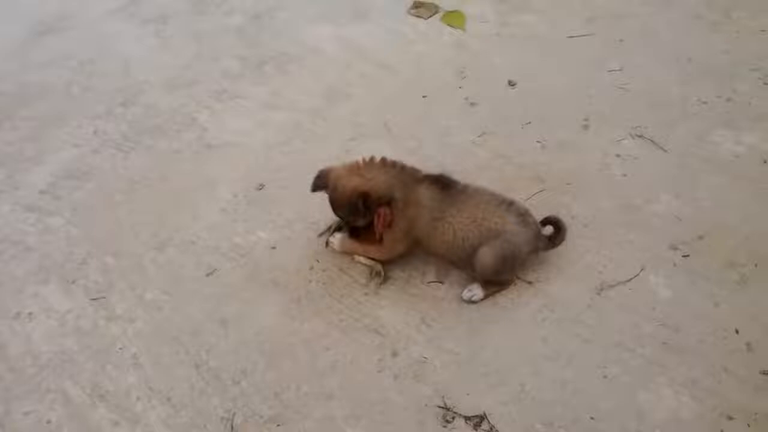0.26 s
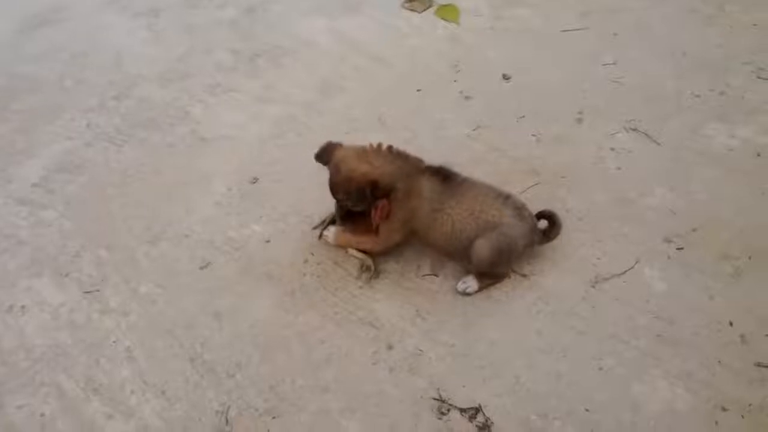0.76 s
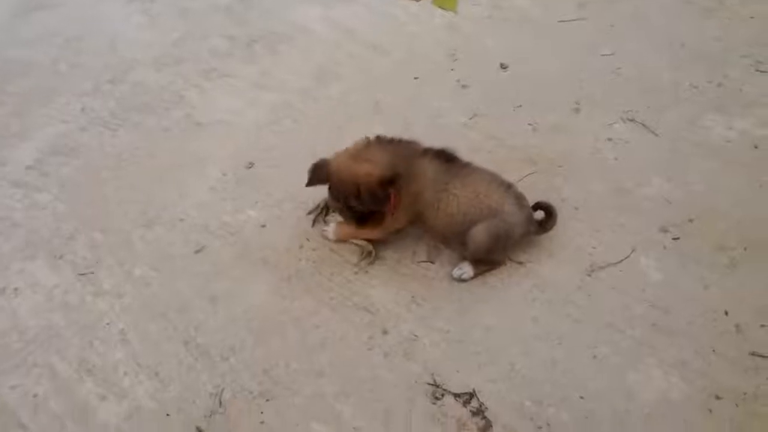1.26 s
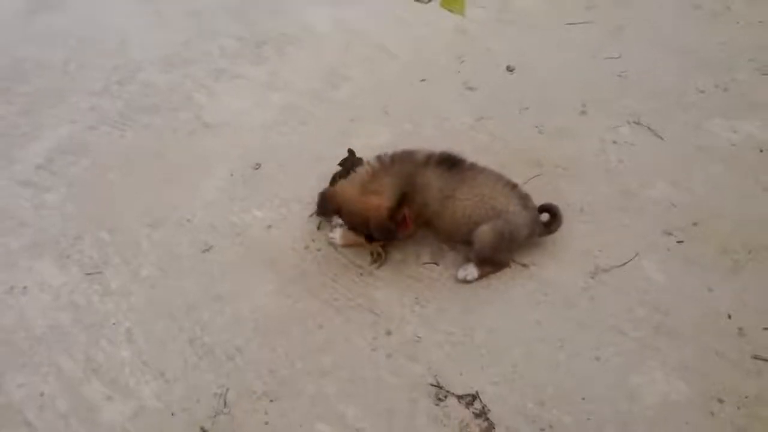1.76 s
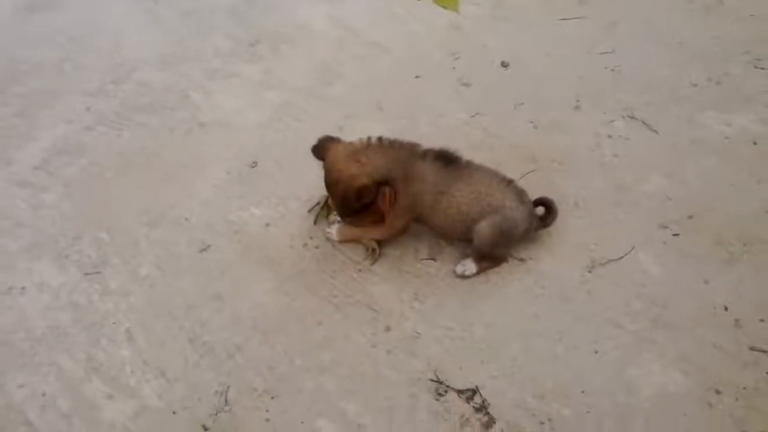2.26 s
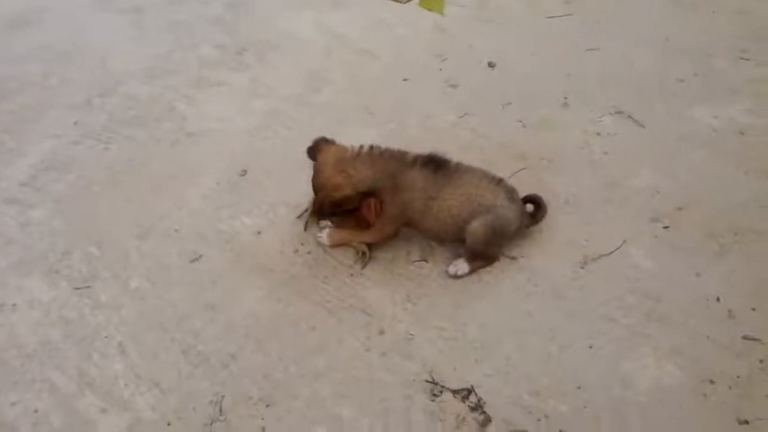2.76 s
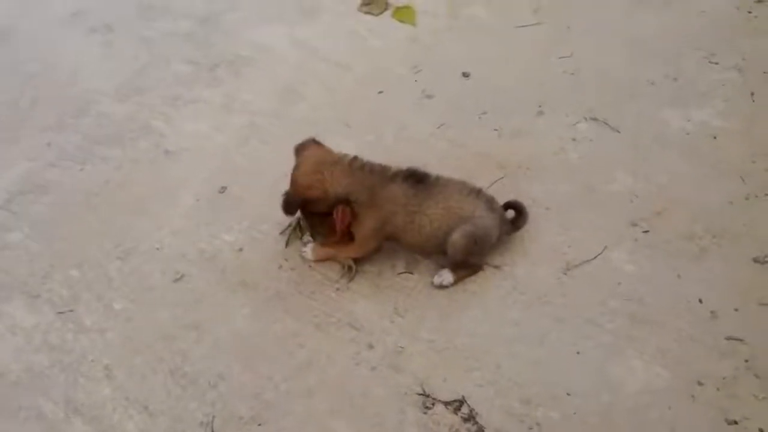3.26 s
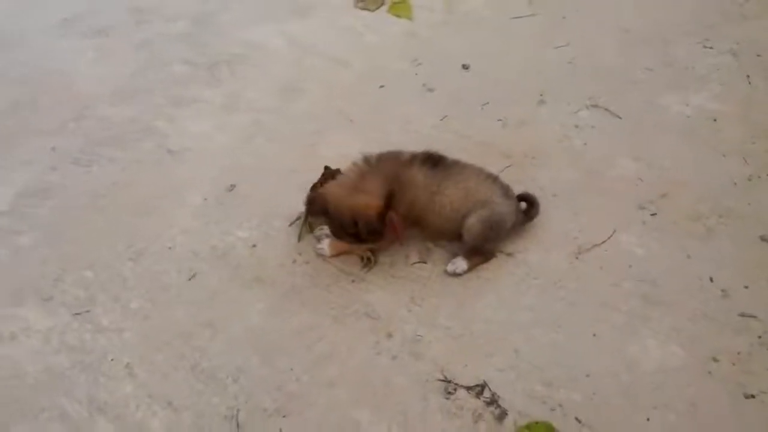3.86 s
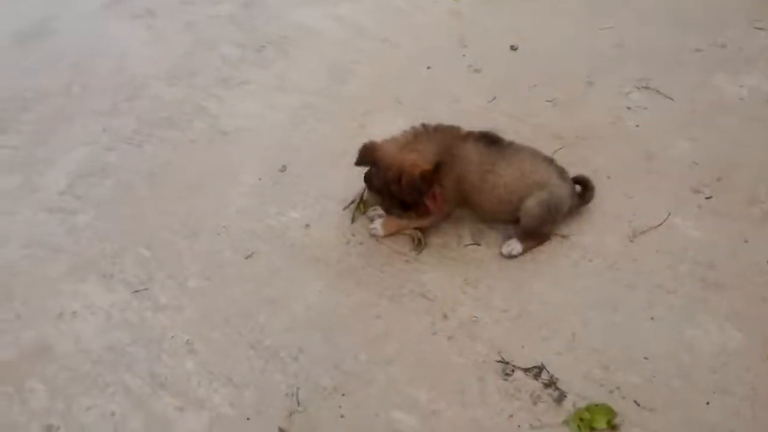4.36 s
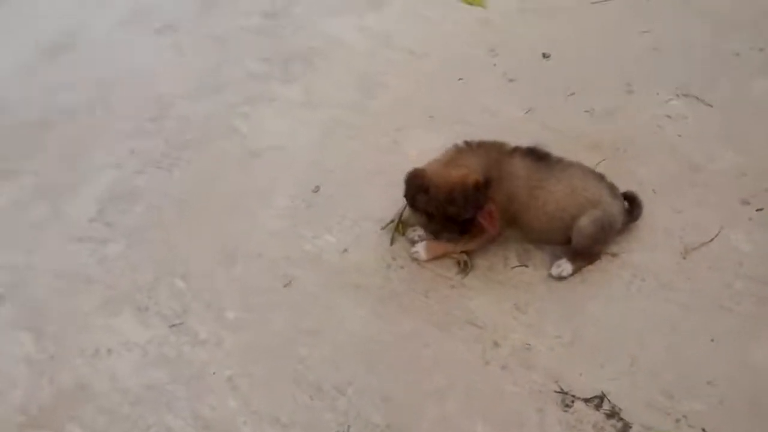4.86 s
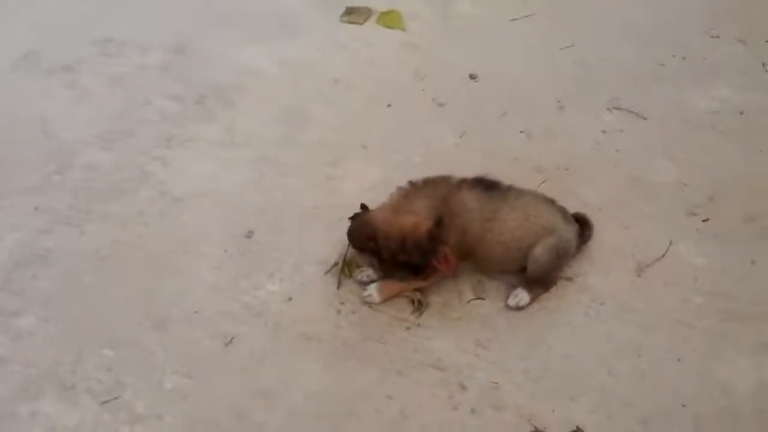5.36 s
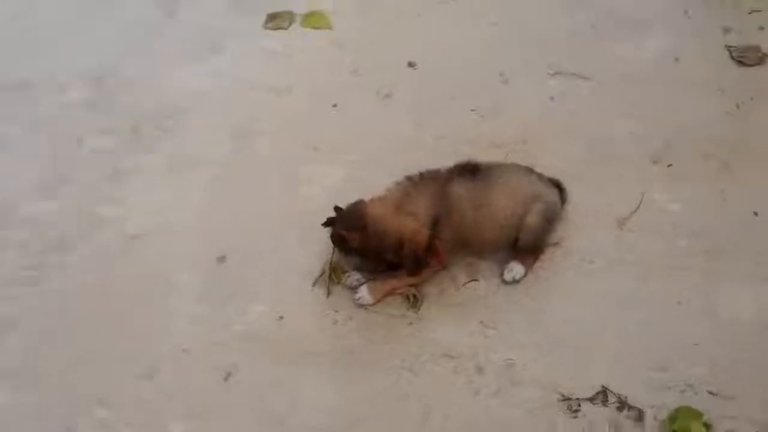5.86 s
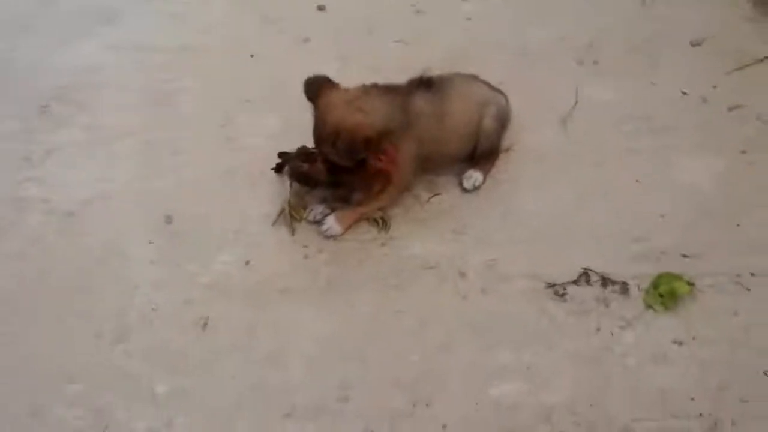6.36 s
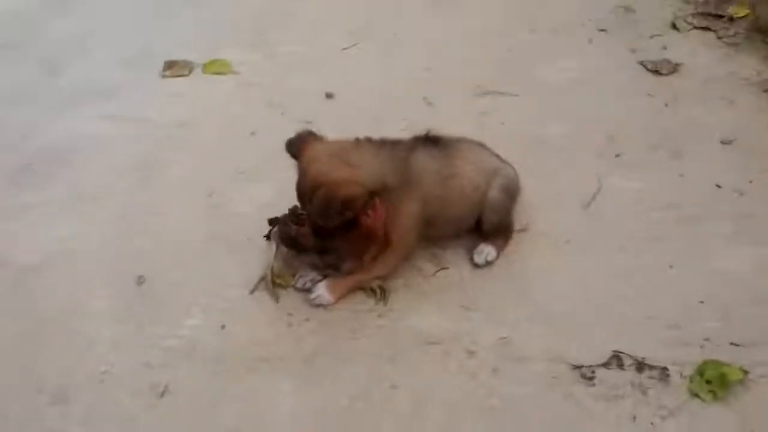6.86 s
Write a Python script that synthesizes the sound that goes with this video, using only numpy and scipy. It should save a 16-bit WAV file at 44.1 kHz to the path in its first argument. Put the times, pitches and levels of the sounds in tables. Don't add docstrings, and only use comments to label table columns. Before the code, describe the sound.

Insects trill and dull pounding repeats as a caught rooster gives a cracked squawk and broken crow, with paws scuffing and claws ticking.

```python
import sys
import numpy as np
from scipy import signal
from scipy.fft import rfft, irfft, next_fast_len
from scipy.io import wavfile
from scipy.ndimage import uniform_filter1d

SR = 44100
rng = np.random.default_rng(int(sys.argv[2]) if len(sys.argv) > 2 else 0)


def ratio(d):
    e = np.asarray(d, float) / 20
    return 10 ** e


def transcribe(signal):
    frames = np.atleast_2d(signal).T
    limited = np.clip(frames, -1, 1)
    pcm = np.round(limited * 32767).astype(np.int16)
    wavfile.write(sys.argv[1], SR, pcm)


N = 313992
TIME = np.arange(N) / SR

# frequency in Hz, density in dB per Hz.
HUSH = [(12, -51), (20, -2.5), (86, 0.5), (155, -3), (194, -2.5), (280, -4), (350, -7), (581, -11),
        (668, -12.5), (1140, -17.5), (4140, -22), (6680, -21.5), (9100, -26), (15100, -19), (16400, -40)]
HUSH_DB = -55.5
# start in seconds, length in seconds, level in dB.
TRILLS = [(-.3, 0.81, -68.5), (0.905, 0.8, -66), (2.357, 0.96, -66), (3.704, 0.84, -67), (5.45, 0.62, -66),
          (6.743, 0.37, -63)]
TRILL_HZ, TRILL_RISE_HZ, TRILL_RISE_S, THROBS_PER_S = 6500, 320, 0.17, 34
CHORUS_DB, CHORUS_HZ = -69, 6480
# start in seconds, length in seconds, level in dB.
HISSES = [(.45, 0.6, -68.5), (1.902, 0.3, -65), (2.486, 0.37, -65), (5.652, 0.77, -64), (6.59, 0.24, -64)]
# start in seconds, length in seconds, first pitch in Hz, last pitch in Hz, level in dB.
CHIRPS = [
    (1.367, 0.03, 2900, 3300, -60),
    (1.45, 0.04, 2950, 3800, -63),
    (1.497, 0.097, 3430, 2700, -61),
    (1.6, .04, 3080, 3230, -63),
    (1.85, 0.056, 4400, 4650, -60),
    (1.898, .05, 4750, 5800, -64),
    (1.953, 0.1, 2580, 4900, -64),
]
# time in seconds, peak in dB, centre in Hz.
TICKS = [(0.8097, -39, 8040), (1.021, -37, 12200), (1.223, -34, 13200), (1.6984, -54, 14100),
         (1.79, -52.5, 12400), (2.6658, -23.5, 15580), (2.9814, -19, 14900), (3.3676, -32, 13480),
         (5.631, -29, 9790), (5.846, -34, 11070), (5.872, -32, 13400), (5.9132, -25, 6000),
         (5.9145, -30, 9000), (6.047, -17, 16000), (6.086, -33, 12500), (6.094, -33, 12000),
         (6.102, -16, 11900), (6.107, -33, 12000), (6.1444, -39, 14600), (6.1554, -23.5, 14300),
         (6.3248, -31, 13370), (6.4338, -26, 13710), (6.4447, -23, 14640), (7.0559, -21, 15300)]
TICK_T60, TICK_TAIL, TICK_WIDTH_HZ = .0025, .07, 10000
# time in seconds, peak in dB, pitch in Hz, decay by 60 dB in seconds.
POPS = [(0.596, -54.5, 700, 0.15), (3.519, -25.5, 3420, 0.072), (5.912, -41, 4400, 0.013),
        (2.666, -45, 4230, 0.022), (2.981, -46.5, 4230, 0.049), (4.659, -32.5, 5060, 0.044),
        (5.5, -35.5, 1050, 0.01), (5.995, -32, 200, 0.014), (5.891, -32.5, 260, .015),
        (3.6, -41, 1300, .01), (7.9, -49, 3000, .02), (6.1, -34.5, 920, 0.02), (6.155, -40.5, 4160, 0.021),
        (6.434, -28.5, 650, 0.0054), (6.438, -34, 224, 0.033), (6.599, -37.5, 1840, 0.013),
        (6.646, -43.5, 1320, 0.024), (2.534, -58, 1753, 0.022), (6.998, -39, 2013, 0.0079)]
# start in seconds, length in seconds, level in dB, centre in Hz, width in Hz.
SCUFFS = [(0.014, 0.035, -47.5, 12430, 5000), (0.882, 0.044, -57, 14500, 4000),
          (1.068, 0.025, -53.5, 13500, 5060), (1.18, 0.068, -61, 14100, 3890),
          (1.344, 0.029, -57, 12900, 4000), (4.811, 0.058, -45.5, 12200, 7600),
          (5.885, 0.052, -54.5, 4540, 2200), (5.959, 0.049, -53, 1370, 2500),
          (6.072, 0.024, -43.5, 6560, 15600), (6.089, 0.024, -38.5, 10100, 15500),
          (6.071, 0.057, -49, 445, 705), (6.121, 0.046, -58.5, 3000, 8000),
          (6.421, 0.19, -48.5, 7760, 17400), (6.458, 0.13, -54.5, 3780, 1510),
          (6.855, 0.23, -58.5, 13800, 5000)]
GRIT_DB = 4.5
# time in seconds, peak in dB, pulse pitch in Hz, far-wall echo gain, dust puff in dB.
THUDS = [
    (0.2786, -17, 139.7, 0.068, -46),
    (1.162, -22.5, 134, 0.034, -48.5),
    (2.054, -27, 134.6, 0.15, -47.5),
    (2.942, -22, 132, 0.032, -50),
    (3.83, -20.5, 134, 0.035, -45),
    (4.698, -21.5, 136, 0.08, -59),
    (5.5958, -20, 141, 0.062, -46),
    (6.4945, -18.5, 137, 0.085, -44),
]
# delay in seconds, gain.
BOUNCES = [(-.0055, 0.0061), (.0057, -.5), (.0115, .3), (.0205, -.24), (.0225, .18), (.034, -.1),
           (.044, .16), (.049, -.2)]
FAR_WALL_S, RUMBLE_DB, RUMBLE_T60 = 0.066, -15.5, 0.42
MORTAR_HZ, MORTAR_T60, MORTAR_DB = 407, 0.086, -18.5
# time in seconds, effort in dB, beak opening
# in dB re effort.
CLUCK = [(3.085, -70, 11), (3.094, -49, 1), (3.104, -29, -13), (3.133, -30.5, -7.5), (3.185, -51.5, 12),
         (3.203, -46, -5), (3.261, -74, 8), (3.28, -64, -3)]
SQUAWK_CURVE = [(3.398, -73, 2), (3.41, -56.5, 9), (3.43, -45.5, 3.5), (3.44, -24.5, -17), (3.47, -20.5, -21),
                (3.487, -19, -17.5), (3.505, -27.5, -13),
                (3.516, -21, -15.5), (3.54, -23, -16), (3.56, -22, -17.5), (3.794, -21.5, -18),
          (3.818, -42, -5), (3.9, -53.5, -11), (3.97, -57, -11)]
# time in seconds, effort in dB, beak opening in dB re effort.
CROW = [
    [(3.97, -55.5, -6), (4.016, -54.5, 1), (4.032, -38.5, -17.5), (4.066, -49.5, 3.5), (4.09, -45, 3.5),
     (4.125, -39, -5), (4.145, -31.5, -8), (4.175, -26.5, -14)],
    [(4.163, -27, -15), (4.188, -30, -7), (4.314, -24.5, -15), (4.422, -29, -8.5), (4.45, -26.5, -11)],
    [(4.5, -29, -8.5), (4.538, -26.5, -13.5), (4.618, -30, -5.5), (4.636, -27, -14.5), (4.664, -29.5, -7),
     (4.704, -36, -2.5), (4.726, -26, -12.5), (4.8, -47, 3.5)],
    [(4.792, -52, 2.5), (4.84, -52.5, 10), (4.905, -51.5, 9.5), (4.925, -46, -4), (4.96, -45.5, -2.5),
     (4.982, -43, -7), (5.02, -44, -3), (5.04, -53.5, 10), (5.098, -55, 10.5), (5.136, -48, 0.5),
     (5.202, -43, -3), (5.216, -48, 10.5), (5.232, -34, -14), (5.24, -37, -0.5)],
    [(5.28, -43, -3), (5.296, -47.5, 9), (5.312, -32.5, -9.5), (5.382, -38, 1.5), (5.416, -31.5, -10),
     (5.45, -47, 4.5), (5.47, -37, 2.5), (5.512, -48, -13.5), (5.57, -71, 15)],
]
# time in seconds, pitch in Hz.
LOW_PITCH = [
    [(3.08, 775), (3.122, 749), (3.15, 698.5), (3.27, 715)],
    [(3.402, 620), (3.427, 630.6), (3.438, 756.6), (3.5, 742), (3.54, 747), (3.8, 747), (3.9, 778)],
    [(3.97, 616), (4.05, 673), (4.075, 613.3), (4.165, 723), (4.53, 708), (4.73, 717), (4.768, 711),
     (4.782, 641)],
    [(4.817, 622.6), (4.865, 604.2), (4.92, 585), (4.97, 585), (5.03, 603), (5.085, 607.6), (5.195, 645)],
    [(5.23, 672.6), (5.285, 654), (5.3, 671), (5.33, 688), (5.414, 675.6), (5.452, 637.5), (5.475, 548)],
]
# start in seconds, roughness 0-1, half-pitch share 0-1.
STATES = [(3.08, .42, .5), (3.185, .93, .1), (3.4, .35, .05), (3.428, .09, .6), (3.515, .48, .4),
          (3.815, .95, .1), (4.065, .18, .02), (4.18, .28, .15), (4.26, .24, .6), (4.44, .34, .6),
          (4.51, .5, .4), (4.785, .14, .02), (4.915, .93, .1), (5.025, .12, .02), (5.2, .22, .05),
          (5.34, .58, .3), (5.4, .3, .02), (5.43, .17, .02), (5.47, .85, .1)]
STATE_GLIDE_S = .025
# start in seconds, length in seconds, first pitch in Hz, level in dB.
FLIPS = [(3.1, 0.0035, 997, 2), (3.121, 0.0067, 905, -9), (3.139, 0.0051, 944, -10), (3.174, 0.015, 872, 8),
         (3.513, 0.011, 894, -1.5), (4.169, 0.34, 885.7, -2), (4.498, .013, 907, 0),
         (4.555, 0.009, 907, -7), (4.568, 0.012, 906, -1.5), (4.589, 0.027, 889, -2.5),
         (4.651, 0.011, 906, 0), (4.674, .038, 878, 1), (4.741, 0.021, 895, -1), (5.342, 0.054, 877, -0.5),
         (5.467, 0.0075, 874, -6)]
# start in seconds, length in seconds.
RATTLE_S = [(3.574, .013), (3.604, 0.016), (3.64, .012), (3.675, 0.011), (3.708, 0.011), (3.741, 0.015),
            (3.772, .012)]
RATTLE_FIRST_HZ, RATTLE_DB = 950, -7.5
HIGH_HZ, HIGH_SAG_HZ_PER_S = 885, 130
CLIMBS_FROM_S, CLIMB, CLIMB_S = 3.53, .08, .011
TORN_START_S, TORN_END_S, TORN_SHARE = 4.5, 4.775, 0.068
BOTH_DB, HANDOVER_DB = -56, 20
# frequency in Hz, gain in dB.
THROATS = [
    [(1500, -40), (1880, -14), (2200, -34), (2550, -13), (3280, 10), (3700, -6), (4170, 10.5), (4700, -1),
     (5200, -19), (5650, -37), (6300, -15), (7100, -3)],
    [(1500, -31), (1850, -3), (2120, 4), (2450, -8), (2700, -15), (2950, -11), (3180, -19), (3400, 0.5),
     (3800, -13), (4120, 2.5), (4480, 1.5), (4900, -3.5), (5050, -10.5), (5700, -22), (6150, -1),
     (6500, -28), (7200, -11)],
    [(1500, -24), (1950, 8), (2150, -16), (2450, -21), (2850, -21), (3200, 2), (3550, -14), (3950, 6),
     (4350, 7), (4800, -7), (5300, -21), (6100, -19), (6800, -7), (7200, -15)],
    [(1500, -16), (1810, 14.5), (2040, -27), (2300, -16), (2600, -11), (3020, 5.5), (3400, -6), (3650, -7),
     (3930, 1.5), (4310, 5.5), (4710, -7.5), (4950, -35), (5300, -25), (5750, -23), (6100, -12.5),
     (6800, -4.5), (7200, -13.5)],
    [(1500, -7), (1810, -0.5), (2040, -37), (2400, -19.5), (2850, 2.5), (3200, -2.5), (3550, -13.5),
     (3980, 9.5), (4200, 1.5), (4450, -1), (4750, -31), (5150, -27), (5750, -20), (6100, -14), (6600, -7.5),
     (7200, -15)],
]
# frequency in Hz, gain in dB.
BEAK = [(7700, -16), (8500, -8), (9100, -18), (9850, -8), (10500, -18), (11800, -10), (12500, -9),
        (12900, -13), (13500, -12), (14100, -9)]
# frequency in Hz, gain in dB.
TOPS = [
    [(14800, -13), (15800, -18)],
    [(14400, -18), (14900, -10), (15800, -20)],
    [(14400, -12), (15800, -14)],
    [(14400, -12), (15800, -16)],
    [(14600, -8), (15000, -22), (15700, -26)],
]
# centre in Hz, width in Hz, level in dB.
WINDPIPE = [
    (750, 150, 3),
    (1400, 250, -4),
    (1880, 160, -2),
]
PIPE_STRETCH, STRETCH_S = 0.924, 4.1
TOP_RASP_DB, BREATH_DB = 5, -5
JITTER, SHIMMER, PATCHY_DB, BLUR_RAD = .011, (.1, .3), 3.5, .0008
SECOND_DB, SECOND_PER_OPEN, SECOND_CAP_DB, SECOND_HIGH_DB = -3, 0.76, 3, 2.5
YARD_DB, YARD_T60 = -14, .22
EDGE_HZ = 15900
UNDER_WHOLE_DB, UNDER_AROUND_DB, TOP_DIP_DB, FICKLE_DB = -45.5, -17, -2.5, 4


def noise(size):
    return rng.standard_normal(size)


def evened(x):
    return x / np.sqrt(np.mean(x ** 2) + 1e-20)


def coloured(x, points):
    hz, (f, db) = np.fft.rfftfreq(len(x), 1 / SR), np.transpose(points)
    gain_db = np.interp(np.log(hz + 1), np.log(f), db, left=-90, right=-90)
    return irfft(rfft(x) * ratio(gain_db), len(x))


def wander(size, hz, count=1):
    length = next_fast_len(size)
    z = rfft(noise((count, length)))
    z = z / (1 + (np.arange(z.shape[1]) * SR / length / hz) ** 4)
    return np.squeeze(evened(irfft(z, length)[:, :size]))


def resonate(x, hz, width):
    turn = np.exp(2j * np.pi * np.cumsum(hz * np.ones(len(x))) / SR)
    r = np.exp(-np.pi * width / SR)
    once = signal.lfilter([1 - r], [1, -r], x / turn)
    return 2 * (turn * signal.lfilter([1 - r], [1, -r], once)).real


def add(mix, s, sound):
    part = mix[max(round(s * SR), 0):][:len(sound)]
    part += sound[:len(part)]


def hush():
    return ratio(HUSH_DB + 0.051 * wander(N, hz=7.0)) * evened(coloured(noise(N), HUSH))


def insects():
    level, hz, hiss_level = np.zeros(N), np.full(N, float(TRILL_HZ)), np.zeros(N)
    for s, length, db in TRILLS:
        age = np.clip(TIME - s, 0, None)
        grown = (1 - np.exp(-age / TRILL_RISE_S)) * (TIME < s + length)
        level = level + ratio(db) * grown * np.clip((length - age) / 0.021, 0, 1)
        hz = hz + TRILL_RISE_HZ * grown
    for s, length, db in HISSES:
        hiss_level = hiss_level + ratio(db) * np.sin(np.pi * np.clip((TIME - s) / length, 0, 1))
    throb = 0.36 + np.maximum(np.sin(2 * np.pi * THROBS_PER_S * TIME), 0) ** 1.1
    trill = evened(throb * resonate(noise(N), hz, width=520))
    chorus = evened(resonate(noise(N), CHORUS_HZ, width=610))
    hiss = evened(resonate(noise(N), 7560, width=2800))
    return level * trill + ratio(CHORUS_DB) * chorus + hiss_level * hiss


def birds():
    out = np.zeros(N)
    for s, length, first_hz, last_hz, db in CHIRPS:
        hz = np.linspace(first_hz, last_hz, round(length * SR))
        hz = hz * (1 + .02 * wander(len(hz), hz=60))
        whistle = np.sin(2 * np.pi * np.cumsum(hz) / SR) / 2
        level = ratio(db + 3 * wander(len(hz), hz=79.3))
        add(out, s, level * whistle * signal.windows.tukey(len(hz), .6))
    return out


def claws():
    out, t = np.zeros(N), np.arange(2000) / SR
    for s, db, hz in TICKS:
        crack = noise(len(t)) * (ratio(-60 * t / TICK_T60) + TICK_TAIL * ratio(-60 * t / 0.39))
        crack = resonate(crack + 6 * (t == 0), hz, TICK_WIDTH_HZ)
        add(out, s, ratio(db) * crack / abs(crack).max())
    for s, db, hz, t60 in POPS:
        onset = 1 - np.exp(-t / (0.022 * t60))
        add(out, s, ratio(db - 60 * t / t60) * np.sin(2 * np.pi * hz * t) * onset)
    for s, length, db, hz, width in SCUFFS:
        size = round(length * SR)
        grit = noise(size) * ratio(GRIT_DB * wander(size, hz=600))
        add(out, s, ratio(db) * evened(resonate(grit, hz, width)) * signal.windows.tukey(size, .7))
    return out


def pestle():
    out, t = np.zeros(N), np.arange(-.012, .4, 1 / SR)
    rumble_points = [(30, -12), (70, 13), (200, -9.5), (420, -6.0), (600, -29.0), (1500, -28.5)]
    for s, db, hz, far, puff_db in THUDS:
        paths = [(0, 1), (FAR_WALL_S, far)] + [(d, g * rng.uniform(0.39, 1.21)) for d, g in BOUNCES]
        blow = np.zeros(len(t))
        for delay, gain in paths:
            v = (np.pi * hz * (t - delay)) ** 2
            blow += gain * (1 - 2.23 * v) * np.exp(-v)
        rumble = evened(coloured(noise(len(t)), rumble_points))
        rumble = rumble * ratio(RUMBLE_DB - 60 * t / RUMBLE_T60) * np.clip(t / 0.0038, 0, 1)
        puff = evened(resonate(noise(len(t)), 17400, width=7000)) * ratio(puff_db - 60 * t / 0.23)
        puff = puff * np.clip((t + 0.028) / 0.0036, 0, 1)
        knock_db = db - 30.5 + 0.5 * (hz - 133.0) - 60 * abs(t) / 0.04
        knock = evened(resonate(noise(len(t)), 810, width=330)) * ratio(knock_db)
        knock = knock * np.clip((t + 0.0039) / 0.0044, 0, 1)
        ring = ratio(MORTAR_DB - 60 * t / MORTAR_T60) * np.sin(2 * np.pi * MORTAR_HZ * t)
        ring = ring * np.clip((t + 0.0051) / 0.0029, 0, 1)
        add(out, s - .012, knock + ratio(db) * (blow + ring + rumble) + puff)
    return out


def held(t, states):
    starts, *columns = np.transpose(states)
    at = np.clip(np.searchsorted(starts, t) - 1, 0, None)
    return [uniform_filter1d(c[at], size=round(STATE_GLIDE_S * SR)) for c in columns]


def membrane(hz, rough, half, rasp, throat):
    size = len(hz)
    order = np.arange(5, 48)[:, None] / 2

    def drift(rate_hz):
        rows = wander(size // 8 + 1, hz=rate_hz, count=len(order))
        return np.repeat(rows, 8, axis=1)[:, :size]

    shaky = 1 + 0.00484 * wander(size, hz=43.1) + JITTER * rough * wander(size, hz=241)
    turns = np.cumsum(hz * shaky) / SR
    shake = [1 + share * (2.4 * rough + 0.22) * wander(size, hz=109) for share in SHIMMER]
    first = np.sqrt(2) * shake[0] * np.cos(2 * np.pi * turns) + 0.18 * half * np.cos(np.pi * turns)
    second = np.sqrt(2) * shake[1] * np.cos(4 * np.pi * turns) + 0.17 * half * np.cos(3 * np.pi * turns)
    share = np.where(order % 1, half, 1)
    patchy = PATCHY_DB * np.minimum(0.86 + 0.69 * rough, 1.1) * np.sqrt(1.56 + order / 16)
    swing = ratio(patchy * drift(120))
    blur = BLUR_RAD * order ** 3 * drift(150)
    pulses = (share * swing * np.cos(2 * np.pi * order * turns + order ** 2 + blur)).sum(0)
    puffs = (0.44 + np.exp(-(turns % 1) / 0.092)) * noise(size) * ratio(2.0 * wander(size, hz=95))
    puffs = coloured(puffs, [(20, 0), (4800, 0.0047), (7000, TOP_RASP_DB), (22000, TOP_RASP_DB)])
    shrill = coloured((1 - rasp) * pulses / 6.9 + 0.9 * rasp ** 1.04 * puffs / 0.33, throat)
    shrill = shrill / np.sqrt(abs(uniform_filter1d(shrill ** 2, size=1800)) + 1e-20)
    voiced = np.sqrt(1 - rough ** 4)
    return np.array([voiced * first, voiced * second, shrill])


def registers(t):
    low_hz = np.interp(t, *np.transpose(sorted(row for table in LOW_PITCH for row in table)))
    high, high_hz, high_db = np.zeros(len(t)), np.full(len(t), float(HIGH_HZ)), np.zeros(len(t))
    for start, length, first_hz, db in FLIPS + [(*jump, RATTLE_FIRST_HZ, RATTLE_DB) for jump in RATTLE_S]:
        end, last_hz = start + length, HIGH_HZ - HIGH_SAG_HZ_PER_S * length
        near = (t > start - .004) & (t < end + .004)
        high[(t > start) & (t <= end)] = 1
        progress = np.clip((t[near] - start) / length, 0, 1) ** 0.45
        high_hz[near] = first_hz + (last_hz - first_hz) * progress
        high_db[near] = db
        climbs = CLIMBS_FROM_S < start < TORN_END_S and length < .1
        low_hz = low_hz * (1 + CLIMB * climbs * (t < end) * np.exp(np.minimum(t - start, 0) / CLIMB_S))
    high, high_db = (uniform_filter1d(v, size=300) for v in (high, high_db))
    return low_hz, high, high_hz, high_db


def windpipe(s, size, rough, second_db):
    pipe = np.array(WINDPIPE) * [PIPE_STRETCH if s > STRETCH_S else 1, 1, 1]
    air = noise(size) * ratio(1.8 * wander(size, hz=89))
    low_air, *upper_air = [ratio(db) * evened(resonate(resonate(air, hz, 2.1 * width), hz, 2.1 * width))
                           for hz, width, db in pipe]
    mixed = rough ** 0.91 * low_air + ratio(second_db + 8.5) * sum(upper_air)
    return ratio(BREATH_DB) * rough ** 2 * mixed


def squawk(rows, throat):
    s, *columns = np.transpose(rows)
    t = np.arange(s[0], s[-1], 1 / SR)
    effort_db, shrill_db = (np.interp(t, s, c) for c in columns)
    second_db = np.minimum(SECOND_DB + SECOND_PER_OPEN * shrill_db, SECOND_CAP_DB)
    rough, half = held(t, STATES)
    low_hz, high, high_hz, high_db = registers(t)
    high_hz = high_hz * (1 + 0.006 * rough * wander(len(t), hz=39.0))
    high = high * np.clip((effort_db - BOTH_DB) / HANDOVER_DB, .3, 1)
    torn = TORN_SHARE * uniform_filter1d(1. * (t > TORN_START_S) * (t < TORN_END_S), size=300)
    high = torn + (1 - 2 * torn) * high
    rasp = np.maximum(rough, half / 3)
    dip = ratio(np.outer([1, 1.5, .2], high_db))
    low_layers = membrane(low_hz, rough, 0.12 * half, rasp, throat)
    high_layers = membrane(high_hz, rough, half, rasp, throat)
    layers = (1 - high) * low_layers + high * dip * high_layers
    levels = ratio([0 * t, second_db + SECOND_HIGH_DB * high, shrill_db])
    voice = (layers * levels).sum(0) + windpipe(s[0], len(t), rough, second_db)
    return s[0], ratio(effort_db) * voice * signal.windows.tukey(len(t), .02)


def yard(x):
    t = np.arange(round(.25 * SR)) / SR
    taps = rng.choice([-1., 1.], len(t)) * (rng.random(len(t)) < .04)
    taps = taps * ratio(-60 * t / YARD_T60) * (t > .004)
    return signal.oaconvolve(x, taps / np.linalg.norm(taps))[:N]


def rooster():
    out = np.zeros(N)
    phrases = [CLUCK, SQUAWK_CURVE, CROW[0], CROW[1] + CROW[2], CROW[3] + CROW[4]]
    for rows, throat, top in zip(phrases, THROATS, TOPS):
        add(out, *squawk(rows, throat + BEAK + top))
    return coloured(out, [(300, -11), (440, -12), (510, -22), (570, -7), (640, 0), (20000, 0)])


def scene():
    bird = rooster()
    return (hush() + insects() + birds() + claws() + pestle() + bird + ratio(YARD_DB) * yard(bird))[None]


def gate_bands(x):
    hz, t, z = signal.stft(x, SR, nperseg=1024, noverlap=768)
    power = abs(z) ** 2
    band = uniform_filter1d(uniform_filter1d(power, size=7, axis=1), size=5, axis=2)
    whole = uniform_filter1d(power.sum(1, keepdims=True), size=5, axis=2) / 7
    around = uniform_filter1d(band, size=50, axis=1)
    whole_db = (UNDER_WHOLE_DB + 2.2 * (hz < 5800))[:, None]
    around_db = np.where(hz > 12800, TOP_DIP_DB, UNDER_AROUND_DB - 7 * (hz < 2700))[:, None]
    patches = uniform_filter1d(uniform_filter1d(noise(band.shape), size=6, axis=1), size=10, axis=2)
    drift = ratio(2 * FICKLE_DB * evened(patches))
    lost = (band < drift * whole * ratio(2 * whole_db)) | (band < drift ** 0.7 * around * ratio(2 * around_db))
    lost = lost & (hz[:, None] > 2000)
    return signal.istft(z * np.where(lost, .03, 1), SR, nperseg=1024, noverlap=768)[1][:, :N]


def top_cut(x):
    return signal.sosfilt(signal.butter(12, 17010, fs=SR, output="sos"), x)


def record(dry):
    limited = signal.oaconvolve(dry, signal.firwin(301, EDGE_HZ, fs=SR)[None], "same")
    finished = gate_bands(limited) - .0006
    return top_cut(finished)


dry = scene()
out = record(dry)
transcribe(out)
```